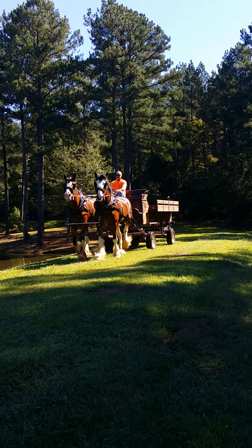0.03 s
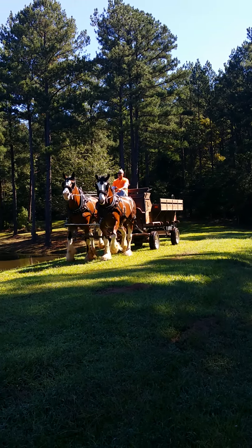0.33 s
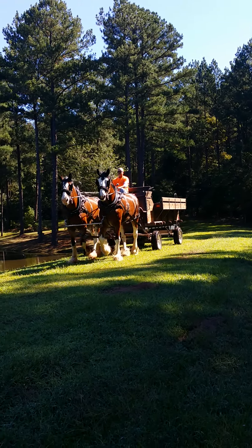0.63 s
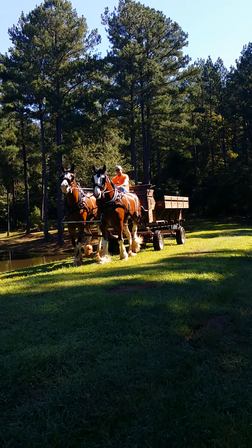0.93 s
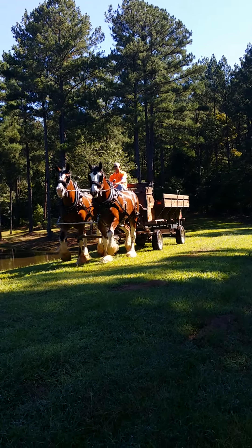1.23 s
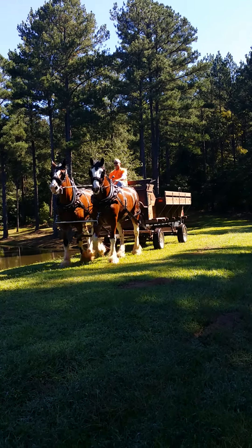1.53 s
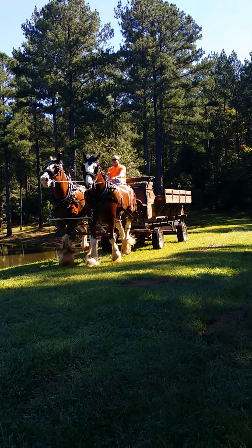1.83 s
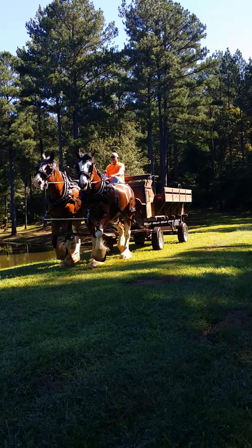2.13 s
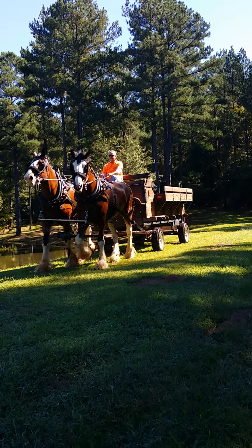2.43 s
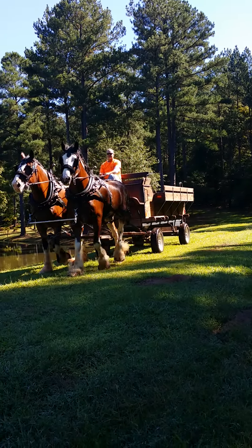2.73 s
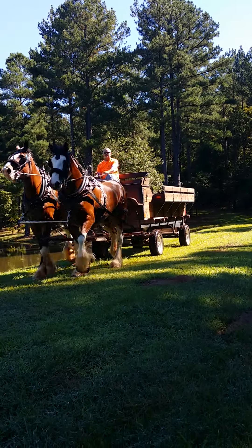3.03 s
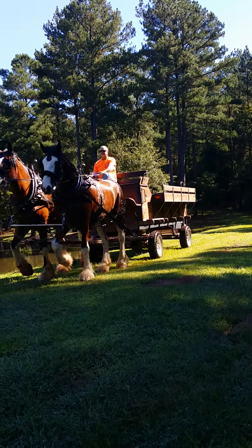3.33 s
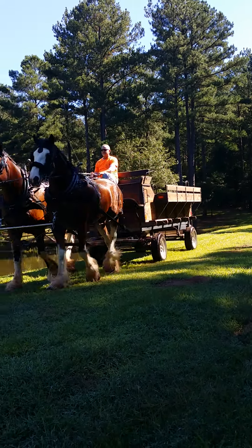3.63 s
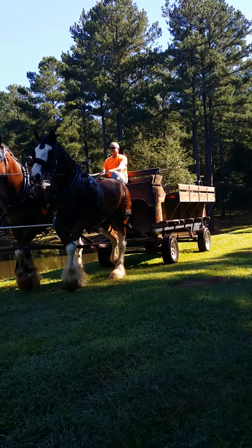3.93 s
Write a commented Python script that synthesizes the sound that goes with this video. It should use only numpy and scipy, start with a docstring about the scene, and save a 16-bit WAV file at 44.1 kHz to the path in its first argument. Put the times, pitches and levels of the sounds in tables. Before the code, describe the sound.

Two heavy horses walk across grass, hooves thudding and swishing while harness chains jingle. Their wooden wagon knocks, rumbles and squeaks briefly, coming slightly nearer the microphone. Sharp harness snaps come late, over faint trees, insects and wind.

```python
"""On a lawn, two heavy horses draw a wooden wagon towards the listener.
Hooves thud on the damped turf and swish through the grass, and hollow wood knocks.
Impacts set trace chains and an iron ring ringing, friction makes the hitch squeak, and the
harness snaps taut. Beneath them the wheels rumble and loose boards patter, against a faint
background of trees, insects and wind."""
import sys
import numpy as np
from scipy import signal
from scipy.fft import rfft, irfft
from scipy.io import wavfile

SR = 44100
rng = np.random.default_rng(int(sys.argv[2]) if len(sys.argv) > 2 else 0)


def store_pcm(level_fs):
    """Save levels as 16-bit WAV."""
    pcm = np.round(np.clip(level_fs, -1, 1) * 32767).astype(np.int16)
    wavfile.write(sys.argv[1], SR, np.atleast_2d(pcm).T)


N = 176400
T = np.arange(N) / SR

# Spectrum of the wheels on turf. Each row: frequency in Hz, relative level in dB.
WHEEL_SPECTRUM = [(35, -31), (55, -7.5), (85, -3), (160, -4), (280, -7), (450, -18), (1000, -46)]
# Spectrum of the loose boards. Each row: frequency in Hz, relative level in dB.
BOARD_SPECTRUM = [(150, -19), (330, -27), (580, 7.5), (850, -2.5), (1350, 1.5), (1750, -8), (2300, -2),
                  (4000, -32)]
# Spectrum of the hiss of trees. Each row: frequency in Hz, relative level in dB.
TREE_SPECTRUM = [(30, -36), (300, -6.5), (600, 4), (1000, 0), (2300, 1), (3500, -1.5), (5100, 3), (8200, 5),
                 (9300, -8), (15000, -4)]
# Modes of a chain link. Each row: frequency in Hz, relative level in dB, 60 dB decay time in seconds.
LINK_MODES = [(5110, 15, 0.13), (5440, -2.5, 0.15), (7980, 3, 0.097), (9995, 5.5, 0.21),
              (10890, 11.5, 0.049), (13290, 4.5, 0.14), (13650, 3.5, 0.14)]
# Shakes of the chains. Each row: start in seconds, length in seconds, relative level in dB.
CHAIN_SHAKES = [(0, 0.053, -43), (0.254, 0.017, -43), (0.491, 0.019, -36), (0.612, 0.087, -39.5),
                (0.639, 0.021, -30), (1.07, 0.021, -37.5), (1.466, 0.043, -44), (1.524, 0.026, -34),
                (2.274, 0.1, -45), (3.092, 0.012, -35.5), (3.202, 0.023, -39.5), (3.29, 0.017, -34),
                (3.423, 0.079, -40), (3.713, 0.044, -37.5), (3.98, .04, -35.5)]
# Single clinks. Each row: start in seconds, relative level in dB, boost of the high modes in dB.
LINK_CLINKS = [(.805, -33.5, 8), (0.822, -29, 2.5), (1.152, -43, 6), (1.343, -34, 4), (1.837, -34.5, 3),
               (2.345, -38, -7), (2.507, -32.5, 0), (2.523, -35.5, 6), (2.576, -33.5, 2.5),
               (3.005, -31.5, 5), (3.41, -24.5, 14.5)]
# Hooves brushing grass. Each row: start in seconds, length in seconds, relative level in dB.
GRASS_SWISHES = [(0.071, 0.057, -41.5), (0.477, 0.019, -33), (0.524, 0.02, -36.5), (0.601, 0.095, -32.5),
                 (0.724, 0.047, -36.5), (0.877, 0.11, -38.5), (1.064, 0.052, -32.5), (1.461, 0.048, -34.5),
                 (1.529, 0.044, -32), (1.594, 0.059, -38), (1.793, 0.017, -36), (1.858, 0.084, -35),
                 (1.951, 0.038, -29.5), (2.141, 0.013, -35.5), (2.241, 0.13, -37.5), (2.403, 0.063, -33),
                 (2.693, 0.049, -32.5), (2.746, 0.029, -31.5), (2.805, 0.018, -33.5), (2.849, 0.047, -30),
                 (2.964, 0.022, -31), (3.148, 0.098, -36.5), (3.322, 0.017, -32.5), (3.591, 0.0091, -33),
                 (3.618, 0.13, -41.5), (3.726, 0.048, -28), (3.779, 0.041, -31)]
# Spectrum of the stalks. Each row: frequency in Hz, relative level in dB.
GRASS_SPECTRUM = [(150, -21), (500, 8.5), (1300, 2.5), (2300, 5.5), (3500, -3), (5500, 0.5), (6800, -5),
                  (8100, 6), (9300, -9.5), (11500, -3.5), (15500, -14.5)]
# Squeaks of the hitch. Each row: start in seconds, length in seconds, pitch in Hz, level in dB,
# octave relative to the fundamental in dB, glide as a fraction of the pitch.
HITCH_SQUEAKS = [(0.077, 0.018, 2705, -38, -18, 0), (.378, 0.06, 2328, -36.5, -6, -.01),
                 (1.34, 0.058, 2262, -36.5, 4, .01), (2.181, 0.018, 2570, -35, -28, .02),
                 (2.207, 0.072, 2265, -28, -8, .003), (2.3, .041, 2444, -20.5, -27, .008),
                 (2.774, 0.02, 2690, -34, -22, -.06), (3.066, 0.034, 2390, -37.5, -18, .03),
                 (3.198, 0.04, 2528, -26, -24, .025), (3.46, 0.025, 2078, -26.5, -17.5, .04)]
# Hooves landing. Each row: start in seconds, level in dB, pitch in Hz, cycles to decay to 1/e.
HOOF_THUMPS = [(.098, -21, 247, 1.42), (0.234, -25.5, 102, 0.91), (0.4913, -20.5, 315, 1.55),
               (0.607, -24, 231, 1.5), (0.618, -26, 194, 1.5), (1.078, -31, 200, 1.9),
               (1.467, -22.5, 257, 1.05), (1.524, -31, 206, 1.4), (1.601, -20, 201, 1.07),
               (2.653, -34, 65, 1), (2.712, -25.5, 185, 2.9), (3.229, -33, 248, 3),
               (3.597, -16.5, 310, 1.3), (3.728, -26, 168, 2.4)]
# Knocks of hooves and wagon wood. Each row: start in seconds, relative level in dB, pitch in Hz.
HOLLOW_KNOCKS = [(0.098, -32, 634), (0.468, -27, 610), (0.532, -31.5, 440), (0.609, -22, 597),
                 (0.956, -27.5, 614), (1.021, -27.5, 1440), (1.078, -28, 477), (1.4, -28.5, 536),
                 (1.466, -24, 594), (1.473, -26.5, 536), (1.522, -22, 550), (1.602, -32, 566),
                 (1.651, -26, 614), (1.86, -26, 607), (1.973, -24, 565), (2.145, -26, 522),
                 (2.282, -24, 650), (2.424, -24, 710), (2.457, -29, 720), (2.621, -22.5, 492),
                 (2.654, -24, 643), (2.705, -22.5, 523), (2.766, -29, 533), (2.872, -25, 760),
                 (3.014, -18.5, 1270), (3.026, -23, 714), (3.115, -25, 660), (3.229, -26, 634),
                 (3.336, -25.5, 560), (3.596, -25, 468), (3.617, -22.5, 504), (3.659, -26.5, 442),
                 (3.811, -26, 685), (3.905, -25, 930)]
# Spectrum of a knock's wooden body. Each row: frequency in Hz, relative level in dB.
WOOD_SPECTRUM = [(150, -1.5), (350, -4), (600, 7), (850, -5), (1350, -3.5), (2000, -9), (5000, -24.5)]
# Harness snaps. Each row: start in seconds, relative tick level in dB, relative crack level in dB.
HARNESS_SNAPS = [(0.4679, -36, -29.5), (0.73, -39, -28), (1.957, -43, -35), (2.088, -53, -30.5),
                 (2.434, -40, -28.5), (2.7046, -39, -35), (2.866, -35, -26.5), (2.985, -31, -20.5),
                 (3.523, -22, -25.5), (3.563, -29, -46), (3.5857, -19, -22.5), (3.637, -29, -42),
                 (3.729, -24.5, -21)]
# A buckle's impact and its rebound. Each entry: gain in dB.
BUCKLE_IMPACTS_DB = [-10.5, -19]
# Blows on the iron ring of the harness. Each row: start in seconds, level in dB.
RING_CLANKS = [(.808, -39.5), (3.06, -44)]
# Modes of that ring. Each row: frequency in Hz, relative level in dB, 60 dB decay time in seconds.
RING_MODES = [(1350, -2, .38), (2982, 1, .38), (4430, -5, .2), (5560, 0, .2)]
# Left-right balance, varying with frequency. Each row: frequency in Hz, left minus right level in dB.
STEREO_BALANCE = [(100, -1), (400, -0.5), (750, -4), (1300, -3.5), (2400, -11.5), (3300, 5.5), (4400, 3.5),
                  (5200, 9.5), (6200, 15.5), (8200, -23), (9500, -13), (14000, -12)]


def undb(db):
    """Convert decibels to an amplitude ratio."""
    return 10 ** (np.asarray(db) / 20)


def unit(x):
    """Normalise to an rms of 1."""
    return x / np.sqrt(np.mean(x ** 2) + 1e-18)


def curve(points, size):
    """Interpolate (Hz, dB) points over log frequency onto the bins of a transform."""
    hz, db = np.array(points, float).T
    return np.interp(np.log(np.arange(size // 2 + 1) * SR / size + 1), np.log(hz), db)


def colour(x, points):
    """Minimum-phase filtering: impose a spectrum causally, with unit power gain."""
    size = 2 * N
    cepstrum = irfft(np.log(unit(undb(curve(points, size)))))
    cepstrum[1:N] *= 2
    cepstrum[N + 1:] = 0
    return irfft(rfft(x, size) * np.exp(rfft(cepstrum)))[..., :N]


def band(x, hz, width):
    """Second-order resonance with gain 1 at its centre."""
    return signal.lfilter(*signal.iirpeak(hz, max(hz / width, .5), fs=SR), x)


def wander(rate):
    """Random modulation: straight lines joining `rate` Gaussian values a second."""
    knots = rng.standard_normal(1024)
    return np.interp(T * rate, np.arange(len(knots)), knots)


def grains(per_s, scatter_db):
    """Poisson process of tiny impacts, mostly weak and a few strong."""
    hit = rng.random(N) < per_s / SR
    size = undb(scatter_db * np.minimum(rng.exponential(size=N), 4))
    return unit(hit * size * rng.choice([-1, 1], N))


def bursts(events, attack_s, release_s):
    """Sum of envelopes, each with a linear attack, a hold and an exponential release."""
    out = np.zeros(N)
    for start, hold, db in events:
        age = T - start
        fade = np.exp(-np.clip((age - hold) / release_s, 0, 50))
        out += undb(db) * np.clip(age / attack_s, 0, 1) * fade
    return out


def add(out, start, x):
    """Superpose a short sound at a start time in seconds."""
    i = max(int(start * SR), 0)
    out[i:i + len(x)] += x[:max(N - i, 0)]


def wagon(near):
    """Random excitation: rolling wheels rumble on the turf and small impacts make loose boards patter."""
    wheels = colour(rng.standard_normal(N), WHEEL_SPECTRUM) * undb(-46.5 + 1.8 * wander(14))
    patter = grains(per_s=400, scatter_db=2.8) * undb(2 * wander(30))
    return wheels + colour(patter, BOARD_SPECTRUM) * undb(-49) * near


def meadow(insect_hz=7760, width_hz=260):
    """Modulated noise: trees hiss over a broad band, distant insects in a narrow one, wind in the bass."""
    trees = colour(rng.standard_normal((2, N)), TREE_SPECTRUM) * undb(-47 + .5 * wander(3))
    insects = band(rng.standard_normal((2, N)), insect_hz, width_hz)
    insects = unit(band(insects, insect_hz, width_hz))
    wind = colour(rng.standard_normal((2, N)), [(28, 1), (60, 0), (130, -14), (400, -30), (2000, -54)])
    insects *= undb(-56 + 3.9 * wander(22.67))
    wind *= undb(-56 + 3.3 * np.array([wander(5.36), wander(5.04)]))
    return trees + insects + wind


def link(bright_db=0, bright_above_hz=8070, clash_hz=5070, clash_s=0.023):
    """Modal vibration: a struck link rings, slightly detuned, over the noisy clash of its neighbours."""
    t, ring = T[:SR // 3], 0
    for hz, db, t60 in LINK_MODES:
        detune, strength, phase = rng.standard_normal(3)
        fade = undb(db + bright_db * (hz > bright_above_hz) + 2 * strength - 60 * t / t60)
        ring = ring + fade * np.sin(2 * np.pi * (hz * (1 + 0.005 * detune) * t + phase))
    clash = unit(band(rng.standard_normal(len(t)), clash_hz, clash_hz)) * np.exp(-t / clash_s)
    return undb(-6 - bright_db) * clash + ring / np.std(ring[:SR // 50])


def chains(near, links=9):
    """Each collision excites a link's impulse response: in showers, singly, or as a faint jingle."""
    jingle = undb(-53) * near * undb(wander(9))
    shake = jingle + bursts(CHAIN_SHAKES, attack_s=0.001, release_s=0.00067)
    out = np.zeros(N)
    for _ in range(links):
        hits = grains(per_s=200, scatter_db=3) * shake
        response = link()
        ringing = signal.fftconvolve(hits, response / np.linalg.norm(response))[:N]
        out += (ringing + undb(-9.5) * hits) / np.sqrt(links)
    for start, db, bright_db in LINK_CLINKS:
        add(out, start, undb(db - 6) * (link(bright_db) + link(bright_db)))
    return out


def grass(near):
    """Granular noise: stalks crackle as hooves sweep them and rustle in patches under the wheels."""
    sweep = bursts(GRASS_SWISHES, attack_s=0.0072, release_s=0.015)
    stalks = grains(per_s=3500, scatter_db=1) * undb(2.8 * wander(220))
    patches = unit(grains(per_s=600, scatter_db=4) * undb(7 * wander(25)))
    return colour(undb(-4) * stalks * sweep + undb(-49.5) * near * patches, GRASS_SPECTRUM)


def hitch(wobble=.005, flutter_db=2, joint_t60_s=.25):
    """Friction in dry iron joints: each squeak swells, wavers and glides, and the joint resonates on."""
    out, t = np.zeros(N), T[:SR // 4]
    for start, length, hz, db, octave_db, glide in HITCH_SQUEAKS:
        progress = np.minimum(t / length, 1)
        drift, grip = wander(250)[:len(t)], wander(130)[:len(t)]
        pitch = hz * (1 + glide * (progress - .5) + wobble * drift)
        phase = 2 * np.pi * np.cumsum(pitch) / SR
        overtones = np.sin(2 * phase) + undb(-14.5) * sum(np.sin(k * phase) for k in range(3, 7))
        swell = np.abs(np.sin(np.pi * progress ** 1.55)) ** .65
        tone = (np.sin(phase) + undb(octave_db) * overtones) * swell * undb(flutter_db * grip)
        ring = unit(band(tone, hz, width=np.log(1000) / np.pi / joint_t60_s))
        add(out, start, undb(db) * np.sqrt(2) * (tone + undb(-11) * np.std(tone) * ring))
    return out


def hooves(rise_s=0.0022):
    """Heavily damped oscillation: each hoof gives the turf a deep push and shifts the soil."""
    out, t = np.zeros(N), T[:SR // 6]
    for start, db, hz, cycles in HOOF_THUMPS:
        soil = unit(band(rng.standard_normal(len(t)), hz, hz))
        push = np.sin(2 * np.pi * hz * t) + undb(-3) * soil
        envelope = np.exp(-t * hz / cycles) * (1 - np.exp(-t / rise_s))
        add(out, start, undb(db) * push * envelope)
    return out


def knocks(decay_cycles=3, impact_s=0.0015, crumble_s=0.027):
    """Impact excitation: one short hollow resonance over a broadband wooden body that crumbles away."""
    hollow, body, t = np.zeros(N), np.zeros(N), T[:SR // 8]
    fade = np.exp(-t / impact_s) + undb(-9.5) * np.exp(-t / crumble_s)
    for start, db, hz in HOLLOW_KNOCKS:
        cycles = hz * t
        ring = np.sin(2 * np.pi * cycles) * np.exp(-cycles / decay_cycles) * np.minimum(cycles, 1)
        add(hollow, start, undb(db - 1.5) * ring)
        add(body, start, undb(db - 5) * rng.standard_normal(len(t)) * fade)
    return hollow + colour(body, WOOD_SPECTRUM)


def harness(tick_hz=8450, width_hz=1870, crack_hz=8000, decay_s=0.0013, rebound_s=0.0045):
    """Impact and rebound: a buckle snaps taut and bounces once, with a damped tick and a broad crack."""
    out, t = np.zeros(N), T[:SR // 50]
    for start, tick_db, crack_db in HARNESS_SNAPS:
        for k, impact_db in enumerate(BUCKLE_IMPACTS_DB):
            push = rng.standard_normal(len(t)) * np.exp(-t / decay_s)
            tick = undb(tick_db) * unit(band(band(push, tick_hz, width_hz), tick_hz, width_hz))
            crack = undb(crack_db) * unit(band(push, crack_hz, 2 * crack_hz))
            add(out, start + k * rebound_s, undb(impact_db) * (tick + crack))
    return out


def iron_ring():
    """Free vibration: a heavy ring's inharmonic modes sound lower and longer than those of the links."""
    out, t = np.zeros(N), T[:SR // 2]
    ring = sum(undb(db - 60 * t / t60) * np.sin(2 * np.pi * hz * t) for hz, db, t60 in RING_MODES)
    for start, db in RING_CLANKS:
        add(out, start, undb(db) * ring)
    return out


def ground_scatter(x, above_hz=1380, decay_s=0.009):
    """Diffuse reflection: the ground adds a brief tail to the treble, different in each channel."""
    t = T[:SR // 5]
    tail = rng.standard_normal((2, len(t))) * np.exp(-t / decay_s)
    tail /= np.linalg.norm(tail, axis=1, keepdims=True)
    treble = signal.lfilter(*signal.butter(1, above_hz, "high", fs=SR), x)
    return x + undb(-0.5) * signal.fftconvolve(treble[None], tail, axes=1)[:, :N]


def stereo(x, left_lag_s=.00002):
    """Channel difference: the balance between left and right varies with frequency, and the left channel lags
    slightly."""
    ratio = undb(curve(STEREO_BALANCE, 2 * N))
    hz = np.arange(N + 1) * SR / (2 * N)
    delay = np.exp(-2j * np.pi * hz * left_lag_s)
    response = np.array([ratio * delay, np.ones_like(delay)]) * 2 / (1 + ratio)
    return irfft(rfft(x, 2 * N) * response)[:, :N]


def scene(approach_db_per_s=1.5):
    """Superposition of team and meadow; rustle, jingle and patter grow as the team comes nearer."""
    near = undb(approach_db_per_s * (T - T.mean()))
    team = hooves() + knocks() + grass(near) + chains(near)
    team += iron_ring() + hitch() + harness() + wagon(near)
    return stereo(ground_scatter(team)) + meadow()


def record(dry, low_hz=61, top_hz=15700):
    """Band limiting: filters remove the deepest bass and the highest treble."""
    thin = signal.sosfilt(signal.butter(4, low_hz, "high", fs=SR, output="sos"), dry)
    return signal.sosfilt(signal.ellip(10, .2, 80, top_hz, fs=SR, output="sos"), thin)


dry = scene()
out = record(dry)
store_pcm(out)
```